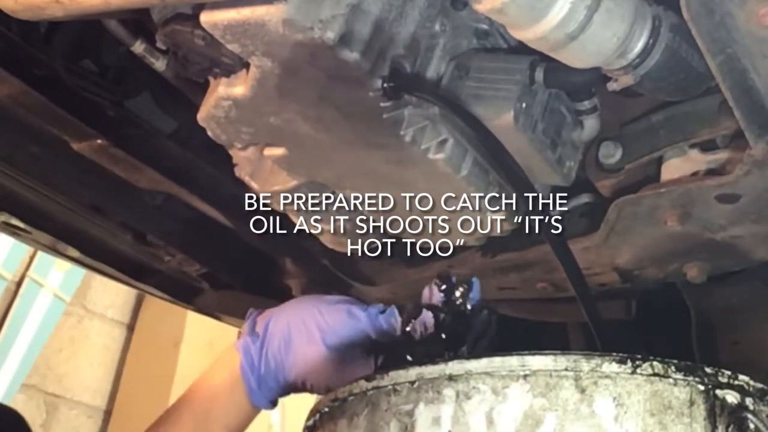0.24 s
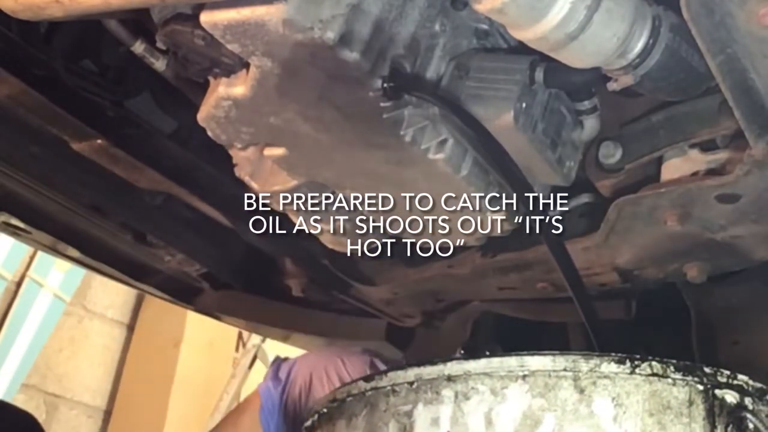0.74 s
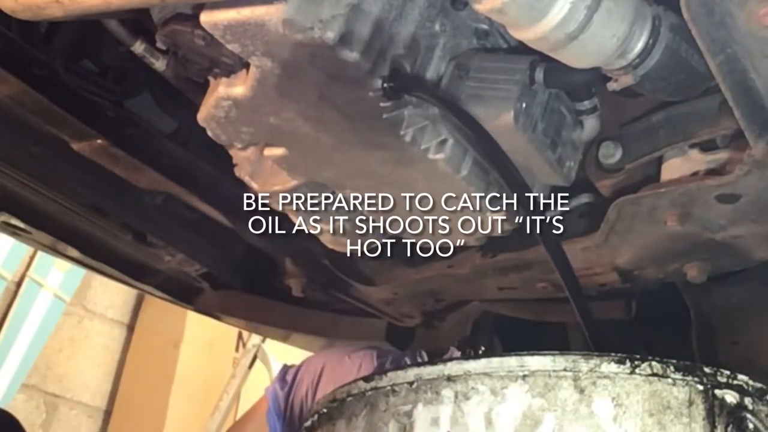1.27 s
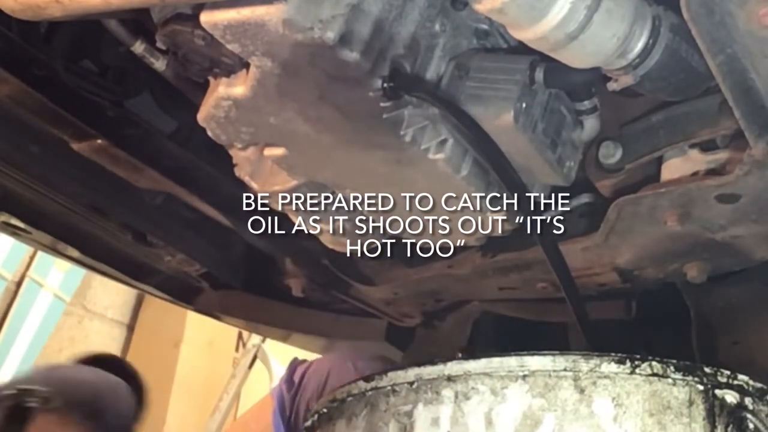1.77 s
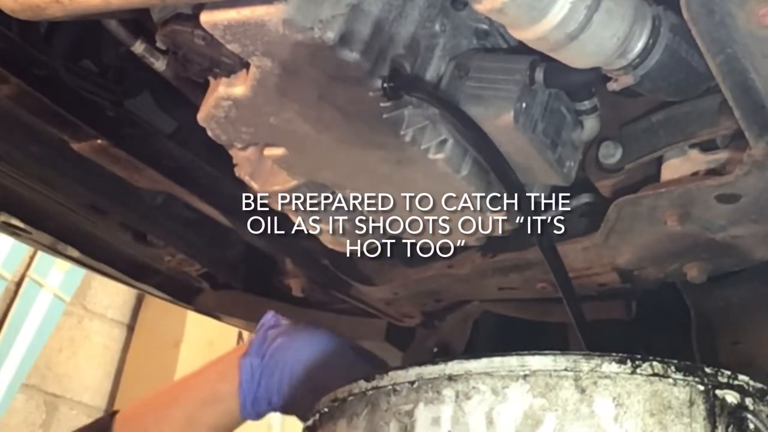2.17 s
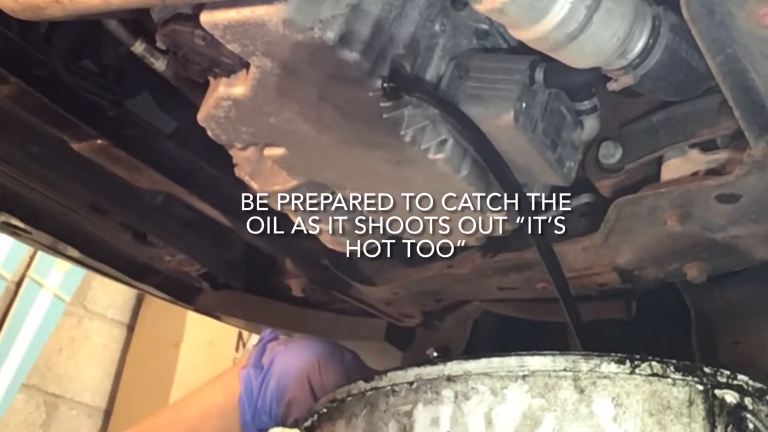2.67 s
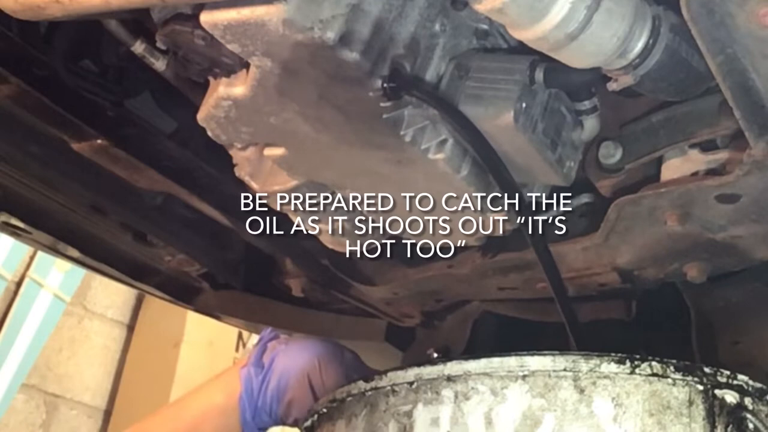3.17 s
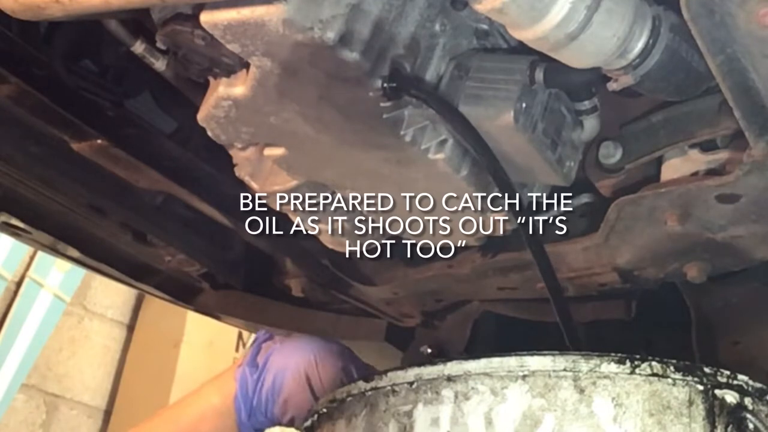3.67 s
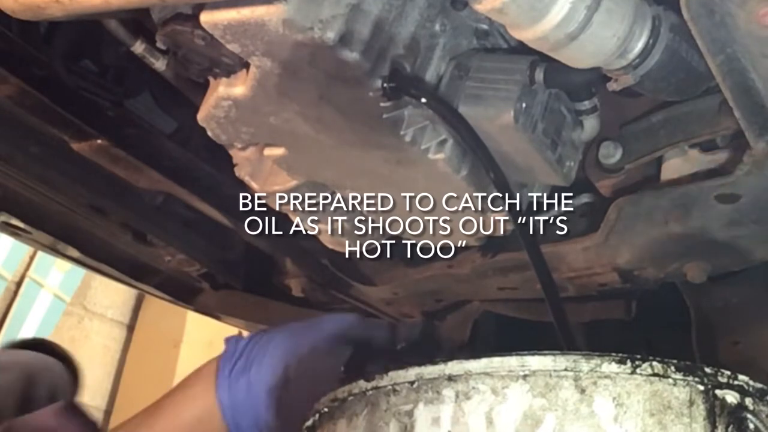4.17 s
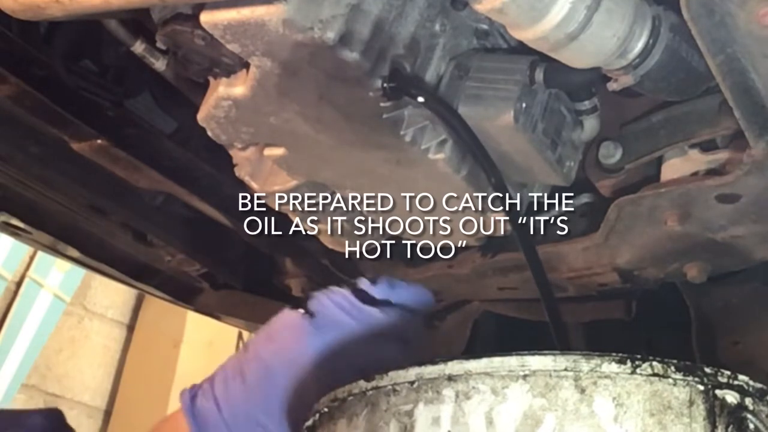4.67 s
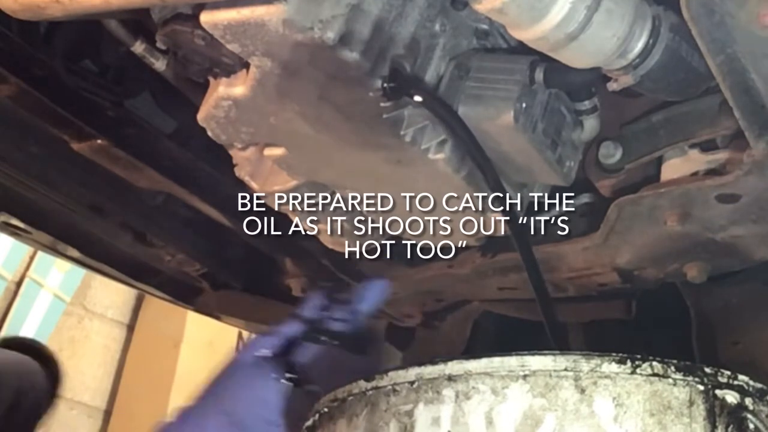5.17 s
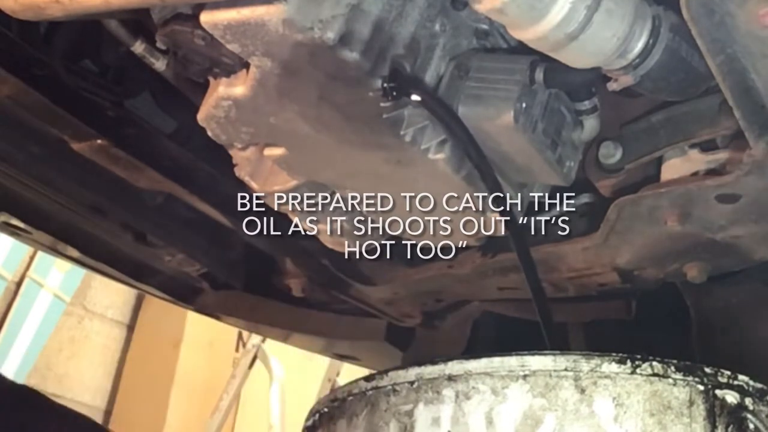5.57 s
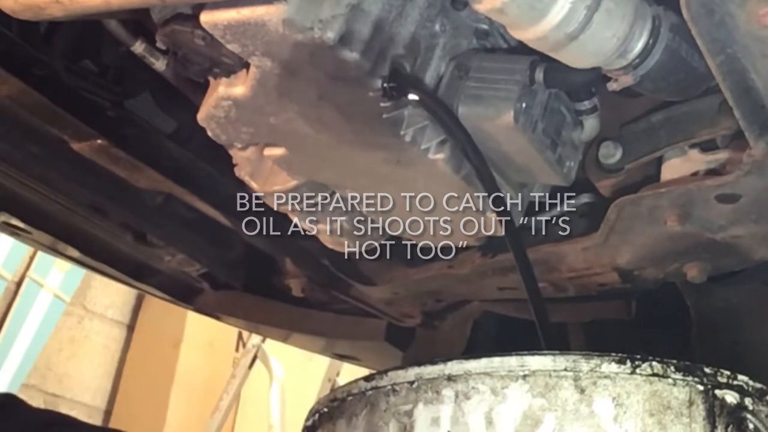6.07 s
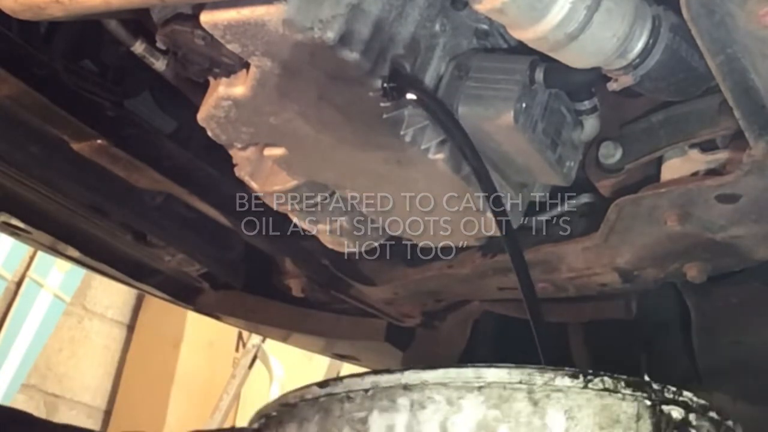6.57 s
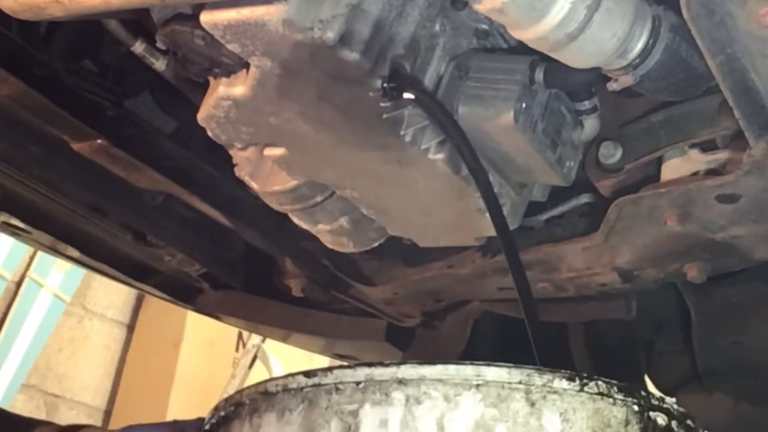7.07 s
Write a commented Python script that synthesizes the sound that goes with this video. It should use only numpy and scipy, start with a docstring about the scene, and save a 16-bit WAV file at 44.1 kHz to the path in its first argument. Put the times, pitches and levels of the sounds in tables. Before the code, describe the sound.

Heard close up under a car, over a low rumbling drone and faint hiss. From 0 to 0.4 seconds a glove rubs softly beneath a thin whining hiss, with small oil ticks and dull knocks at 0.2 and 0.65. Around 1.3 to 1.8 small bubbles glug and wet clicks gather. Bumps and rubs lead into a sudden gush just after 2: a bright spray spurt and a firm knock near 2.2, then crackling splashes and hollow low booms in the metal pan until about 4.2. A thump and brief splash come around 4.35. From 4.6 the flow thins to a quiet jet with separate sharp splats, and soft rubbing near 4.8 and 5.1. At 6.35 to 6.9 the pan is dragged in loud juddering, gritty scrapes with a strong knock at 6.5 and metallic ringing. Quiet returns, dips briefly near 7.15, then light clacks end it.

```python
"""Hot engine oil drains from a sump into a metal pan, heard close up under a car: bubble pings and clicks shaped
by a flow curve. It sprays past the loosened plug (bright hiss), falls in slaps that boom in the pan (swelling tones),
then settles to a quiet jet with single splats (crackle plus pings). A hand bumps (damped swings) and rubs (noise);
near the end the pan is dragged over the floor (stick-slip bursts through its resonances), then light clacks.
Behind: a thin early whine, low rumble with a drone, faint hiss (filtered noise)."""
import sys
import numpy as np
from scipy import signal
from scipy.fft import rfft, irfft
from scipy.io import wavfile
from scipy.ndimage import uniform_filter1d

SR = 44100
rng = np.random.default_rng(int(sys.argv[2]) if len(sys.argv) > 2 else 0)


def to_wav(sig):
    """Store sig (one row per channel, or 1-D mono) as 16-bit WAV at the path in sys.argv[1].

    Samples outside -1..1 are clipped; the rate is SR.
    """
    pcm = np.clip(np.atleast_2d(sig), -1, 1) * 32767
    pcm = np.round(pcm).astype(np.int16)
    wavfile.write(sys.argv[1], SR, pcm.T)  # frames by channels


N = 323694
T_S = np.arange(N) / SR

# Low rumble under the car: t/s, level/dB (before its flicker)
RUMBLE_LEVEL_DB = [(0, -61.5), (1.3, -64), (2.2, -57.5), (2.65, -67.5), (3.5, -66), (4.2, -62.5),
                   (5.4, -63), (5.65, -67), (7.34, -67.5)]
# Rumble spectrum: f/Hz, relative level/dB
RUMBLE_COLOUR_DB = [(30, -16), (50, -23), (75, -7.5), (112, 5), (150, -3), (220, -4.5), (330, -9),
                    (430, -9.5), (560, -13.5), (700, -31), (1500, -38), (3000, -40)]
# Low note of the space under the car: f/Hz, width/Hz, level/dB
DRONE_MODES = [(112, 15.5, 0)]
DRONE_DB = -71
# Faint hiss spectrum: f/Hz, relative density/dB
AIR_COLOUR_DB = [(500, 4.5), (1000, -0.5), (2200, -4), (4000, -9), (7000, -14), (9500, -8), (15500, -16)]
AIR_DB = -73.5

# Strength of the falling oil: t/s, level/dB (before surges)
FLOW_DB = [(0, -78), (.5, -93), (1.25, -78), (1.75, -79), (1.96, -78), (2.07, -60.5), (2.5, -62.5),
           (2.7, -65.5), (3.35, -63.5), (4.21, -64), (4.3, -72.5), (4.39, -60.5), (4.62, -68.5),
           (4.72, -72), (5.6, -73.5), (6.1, -79), (7.34, -77)]
# Splash spectrum: f/Hz, relative level/dB
SPLASH_COLOUR_DB = [(290, -38), (500, 13), (666, -7), (827, -4.5), (941, -11.5), (1100, -2), (1470, -11),
                    (2390, -7), (2890, -14.5), (3430, -2), (4000, -12), (4400, -2.5), (5200, -14),
                    (8240, -25), (15500, -42)]
# Fine spray spectrum: f/Hz, relative level/dB
SPRAY_COLOUR_DB = [(2000, -23), (4500, 5.5), (6500, 6.5), (9500, 2.5), (12000, -5.5), (15500, -5)]
SPRAY_DB, SPRAY_DB_PER_FLOW_DB = -70, 0.53  # at full flow, before surges; slope against flow
# Spurts of fine spray: start t/s, length/s, level/dB
SPURTS = [(1.62, 0.66, -67), (1.98, 0.13, -66), (2.212, 0.031, -51), (3.04, 0.05, -72), (3.29, 0.075, -66),
          (4.36, 0.086, -68), (7.18, 0.13, -76)]
SPURT_RISE_SHARE, SPURT_RELEASE_S = 0.092, 0.0067  # rise as share of length
# Clumps of oil landing: rate, decay of power, share of splash power
LANDINGS_PER_S, LANDING_DECAY_S, LANDING_SHARE = 170, 0.0054, 0.85
# Blobs of one size: rate, decay of power, share of that band's power
BLOBS_PER_S, BLOB_DECAY_S, BLOB_SHARE = 130, 0.0072, 0.77
# Air in the pan: f/Hz, width/Hz, level/dB
HOLLOW_MODES = [(408.5, 16.2, 11.5), (438, 20, 4.5), (1114, 72, -5.5), (1545, 57, -12), (2400, 110, -16),
                (4430, 76, -9)]
# Hum of the hollow, fading as the jet smooths out: t/s, level/dB
HUM_LEVEL_DB = [(1.2, -76), (2.2, -59), (3.5, -60), (4.1, -62.5), (4.9, -77)]
STEADY_SHARE = 0.17  # share of a note's flicker evened out

# Soft rubs of glove and sleeve: start t/s, length/s, level/dB (before flicker)
RUBS = [(0, 0.35, -70.5), (1.46, 0.17, -70.5), (1.69, 0.17, -67), (2.02, 0.089, -61.5), (2.12, 0.093, -55),
        (2.28, 0.32, -68.5), (4.74, 0.16, -65), (5.11, 0.35, -64.5), (7.19, 0.16, -71)]
# Rub spectrum: f/Hz, relative level/dB
RUB_COLOUR_DB = [(200, 7), (550, 6), (1300, 0), (2200, -4), (3500, -9), (7000, -9.5), (15000, -17.5)]
RUB_RISE_SHARE, RUB_RELEASE_S = 0.038, 0.033
# Thin early hiss with a faint whine: start t/s, length/s, level/dB
WHINE = [(0.0084, 0.41, -72.5)]
# Its bands: f/Hz, width/Hz, level/dB
WHINE_BANDS = [(3390, 120, 12), (4440, 920, 2)]
# Sharpest splats: t/s, level/dB, centre f/Hz
SPLATS = [(.152, -61, 3430), (0.193, -54.5, 2800), (0.403, -61, 3700), (.862, -61.5, 2290),
          (1.285, -61, 6340), (1.329, -60.5, 4420), (1.493, -60, 5130), (1.739, -66, 6360),
          (1.761, -53, 8350), (1.743, -59.5, 1770), (1.826, -48.5, 4930), (1.884, -56.5, 6150),
          (2.048, -58, 7600), (2.277, -58, 2990), (2.595, -53.5, 4030), (3.002, -57, 5000),
          (3.196, -56, 3580), (3.218, -67, 7080), (3.302, -52.5, 4300), (3.328, -53, 6860),
          (3.507, -61, 7300), (3.562, -54, 4360), (3.752, -53, 4300), (3.852, -50, 3040),
          (3.936, -53.5, 4630), (3.976, -54, 4430), (4.109, -57.5, 3200), (4.154, -50, 3640),
          (4.456, -60, 2840), (4.61, -53.5, 4440), (4.687, -53, 3490), (4.797, -56, 2620),
          (4.94, -53, 3730), (4.982, -56.5, 3520), (5.467, -57.5, 3460), (5.727, -57, 3180),
          (5.819, -58, 3630), (5.903, -59, 4600), (6.169, -57.5, 3460), (6.273, -54, 4180)]

# Dull knocks: t/s, level/dB, swing f/Hz
KNOCKS = [(0.21, -50.5, 566), (.217, -49, 200), (0.647, -41, 354), (.682, -47, 191), (1.86, -44, 370),
          (2, -39.5, 228), (2.066, -44, 228), (2.203, -35.5, 397), (2.214, -41.5, 211), (4.076, -47, 204),
          (4.112, -50, 206), (4.256, -47.5, 520), (4.337, -37.5, 260), (4.356, -45.5, 460),
          (4.555, -46, 218), (5.033, -50, 534), (5.434, -51, 192), (6.309, -48, 207), (6.427, -29, 437),
          (6.472, -31.5, 426), (6.4905, -18.5, 433), (6.692, -43.5, 475), (6.796, -32.5, 417),
          (6.831, -28.5, 348)]
# Low body set swinging by knocks; level against the blow for slow blows
THUD_HZ, THUD_DB, THUD_DECAY_S = 114.7, -3.5, 0.018
# Pan wall: f/Hz, width/Hz, level/dB
WALL_MODES = [(161, 48, -5.5), (259, 35, -1.5), (320, 15, 2.5), (417, 17, 10), (487, 24, 8.5),
              (544, 11, 8.5), (770, 80, -8.5), (1030, 54, -8), (1125, 37, 2)]

# Air bubbles as the plug comes free: mean time and spread, median level
GLUG_S, GLUG_SPREAD_S, GLUG_DB = 1.56, 0.17, -69.5
GLUG_HZ, GLUG_SPREAD_OCTAVES, GLUG_DECAY_S = 1450, 0.37, 0.003
# Heavy slugs of oil landing in the pan: t/s, boom level/dB
SLUGS = [(1.306, -55), (1.524, -54.5), (2.225, -42), (2.328, -48.5), (2.403, -45.5), (2.499, -64),
         (2.581, -54), (2.77, -55.5), (2.866, -54), (3.079, -50.5), (3.138, -46.5), (3.214, -54),
         (3.311, -50), (3.357, -46.5), (3.432, -51), (3.571, -52), (3.624, -53.5), (3.696, -54),
         (3.775, -52.5), (3.852, -55), (3.997, -68), (4.15, -53), (4.389, -53.5)]
SLUG_HZ, SLUG_RISE_S, SLUG_DECAY_S = 409, 0.011, 0.018
SURGE_DB, SURGE_WIDTH_S, SURGE_LEAD_S = 4.5, 0.013, 0.0047  # splash swell per slug, ahead of its boom

# Shoves that drag the pan: start t/s, length/s, shudder level/dB, grit level/dB
SHOVES = [(6.357, 0.089, -36.5, -50.5), (6.442, 0.085, -38.5, -50.5), (6.529, 0.082, -51, -51.5),
          (6.584, 0.11, -43.5, -58), (6.707, 0.029, -52.5, -83), (6.776, 0.025, -37, -62.5),
          (6.815, 0.045, -40, -63.5)]
SHOVE_RISE_SHARE, SHOVE_RELEASE_S = 0.55, 0.021
# Stick-slip: rate, decay of power, slips' share of power
SLIPS_PER_S, SLIP_DECAY_S, SLIP_SHARE = 320, 0.0038, 0.99
# Grit spectrum: f/Hz, relative level/dB
GRIT_COLOUR_DB = [(400, -21), (900, 9), (1500, 2), (2300, -7), (4400, -3), (6000, -11.5), (8500, -10.5),
                  (15500, -23)]
# Thin metallic ring of the rim: f/Hz, width/Hz, level/dB
RIM_MODES = [(1850, 170, 6), (2335, 40, 13), (2490, 24, 0), (3090, 76, 2)]
# Grit cracking under the pan: t/s, level/dB, centre f/Hz, decay/s
CRACKS = [(6.419, -50, 2770, .008), (6.434, -40.5, 2200, 0.008), (6.531, -46, 2180, .004),
          (6.609, -47.5, 4300, 0.022), (6.868, -58, 5660, 0.0042)]
# Something hard being handled: t/s, level/dB
CLACKS = [(7.205, -60.5), (7.251, -61.5), (7.301, -51)]
# Its resonances: f/Hz, width/Hz, level/dB
CLACK_MODES = [(630, 110, 1.5), (1500, 70, -6), (2460, 180, -14)]

# Bands cancelled by the echo off the pan's side: f/Hz, width/Hz
NULLS = [(665, 152), (1470, 106)]
ECHO_T60_S = 0.065
DIP_S, DIP_DECAY_S, DIP_DB = 7.159, 0.012, -24  # brief level dip, depth at its centre
EDGE_HZ = 15750


def gain_of(db):
    """Decibels to amplitude."""
    return 10 ** (np.asarray(db) / 20)


def evened(x):
    """Scales to rms 1."""
    return x / np.sqrt(np.mean(x ** 2) + 1e-20)


def loudest(x, size):
    """Scales so that the loudest stretch of size samples has rms 1."""
    return x / np.sqrt(uniform_filter1d(x ** 2, size, mode="constant").max() + 1e-20)


def level(rows):
    """Amplitude over time from a curve of (t/s, level/dB)."""
    return gain_of(np.interp(T_S, *np.transpose(rows)))


def add(mix, start_s, sound):
    """Mixes a sound in, in place."""
    part = mix[max(round(start_s * SR), 0):][:len(sound)]
    part += sound[:len(part)]


def colour(x, points):
    """Filters by a spectrum of (f/Hz, level/dB), log-frequency interpolation; rms 1."""
    hz, db = np.transpose(points)
    f_hz = np.fft.rfftfreq(len(x), 1 / SR)
    gain = gain_of(np.interp(np.log(f_hz + 1), np.log(hz), db))
    return evened(irfft(rfft(x) * gain, len(x)))


def wander(hz):
    """Random drift of rms 1, up to about hz."""
    f_hz = np.fft.rfftfreq(N, 1 / SR)
    return evened(irfft(rfft(rng.standard_normal(N)) / (1 + (f_hz / hz) ** 4), N))


def resonate(x, hz, width_hz):
    """One resonance, unit gain at its peak."""
    return signal.lfilter(*signal.iirpeak(min(hz, SR / 2 - 1), hz / width_hz, SR), x)


def ring(x, modes):
    """A body's resonances in parallel, all driven by x."""
    return sum(gain_of(db) * resonate(x, hz, width_hz) for hz, width_hz, db in modes)


def steadied(x):
    """Evens out part of a note's flicker; rms 1."""
    power = abs(uniform_filter1d(x ** 2, size=1000)) + 1e-20
    return evened(x / power ** (STEADY_SHARE / 2))


def gestures(rows, rise_share, release_s, curve=0.98):
    """Amplitude of (start/s, length/s, level/dB) moves: swell, hold, die away; powers add."""
    power = np.zeros(N)
    for start_s, length_s, db in rows:
        t = np.arange(0, length_s + 10 * release_s, 1 / SR)
        swell = np.minimum(t / (rise_share * length_s), 1) ** curve
        release = np.exp(-np.maximum(t - length_s, 0) / release_s)
        add(power, start_s, (gain_of(db) * swell * release) ** 2)
    return np.sqrt(power)


def clicks(per_s, mean_db):
    """Random impacts, mostly small, a few large; exponential spread in dB, rms 1."""
    size = gain_of(mean_db * np.minimum(rng.exponential(1, N), 4))
    sign = rng.choice([-1, 1], N)
    return evened(size * sign * (rng.random(N) < per_s / SR))


def bursts(per_s, decay_s, share):
    """Amplitude of random contacts over a steady floor: instant start, exponential decay of power."""
    t = np.arange(SR // 20) / SR
    hits = rng.exponential(1, N) * (rng.random(N) < per_s / SR)
    power = abs(signal.oaconvolve(hits, np.exp(-t / decay_s))[:N])
    return np.sqrt(1 - share + share * power / power.mean())


def bubbles(count=800, spread_db=4.0, cycles=6.2):
    """Bubbles of many sizes pop; thick oil damps each within a few cycles."""
    t, out = np.arange(SR // 25) / SR, np.zeros(N)
    for hz in np.geomspace(900, 13000, 36):
        age = hz * t / cycles
        swing = np.sin(2 * np.pi * hz * t) * np.exp(-age) * (1 - np.exp(-3 * age))
        ping = np.sqrt(hz) * evened(swing)
        for when, size, sign in rng.random((count, 3)):
            gain = gain_of(-spread_db * np.log(size + 0.066))
            add(out, when * N / SR, np.sign(sign - .5) * gain * ping)
    return evened(out)


def blobs(x, count=10):
    """Lumps of each size come at their own moments, so the colour keeps shifting; rms 1."""
    octave = np.log2(np.fft.rfftfreq(N, 1 / SR) + 1)
    centres = np.log2(np.geomspace(900, 13000, count))
    spectrum, out = rfft(x), np.zeros(N)
    for band in np.eye(count):
        part = irfft(spectrum * np.interp(octave, centres, band), N)
        out += part * bursts(BLOBS_PER_S, BLOB_DECAY_S, BLOB_SHARE)
    return evened(out)


def garage():
    """Lumpy low rumble, one steady droning note and thin hiss, all filtered noise."""
    low, air, note = rng.standard_normal((3, N))
    boom = colour(low, RUMBLE_COLOUR_DB) * gain_of(1.2 + 2.0 * wander(14)) * level(RUMBLE_LEVEL_DB)
    drone = gain_of(DRONE_DB) * steadied(ring(note, DRONE_MODES))
    return boom + drone + gain_of(AIR_DB) * colour(air, AIR_COLOUR_DB)


def stream(spray_flicker_db=3.7):
    """Landing clumps crackle with small bubbles, throw fine spray and keep the pan's air humming."""
    flow = level(FLOW_DB)
    landings = bursts(LANDINGS_PER_S, LANDING_DECAY_S, LANDING_SHARE)
    t = T_S[::20]
    swell = sum(np.exp(-.5 * ((t - s + SURGE_LEAD_S) / SURGE_WIDTH_S) ** 2) for s, _ in SLUGS)
    surge = gain_of(SURGE_DB * np.interp(T_S, t, swell) + 0.91 * wander(24))

    drops = blobs(bubbles() + .45 * clicks(5000, 0.84))
    splash = colour(drops, SPLASH_COLOUR_DB) * flow * landings * surge

    thrown = gain_of(SPRAY_DB) * (flow / flow.max()) ** SPRAY_DB_PER_FLOW_DB * surge
    spurts = gestures(SPURTS, SPURT_RISE_SHARE, SPURT_RELEASE_S)
    droplets = blobs(bubbles() + 0.62 * rng.standard_normal(N))
    mist = colour(droplets, SPRAY_COLOUR_DB) * landings * gain_of(spray_flicker_db * wander(110))

    hum = steadied(ring(rng.standard_normal(N) * landings, HOLLOW_MODES)) * level(HUM_LEVEL_DB)
    return splash + mist * np.hypot(thrown, spurts) + hum


def glove():
    """Rubber and cloth slide and catch: an uneven, grainy rustle."""
    grain = colour(rng.standard_normal(N) + 1.2 * clicks(900, 1.1), RUB_COLOUR_DB)
    return grain * gestures(RUBS, RUB_RISE_SHARE, RUB_RELEASE_S) * gain_of(3.5 * wander(29))


def whine(rise_share=0.32, release_s=0.0094):
    """Thin, steady hiss with one narrow band, stopping short."""
    hiss = evened(ring(rng.standard_normal(N), WHINE_BANDS))
    return hiss * gestures(WHINE, rise_share, release_s)


def splat(hz, scatter_s=0.0094, cycles=13, bubble_db=1, count=5, crackle_s=0.0052):
    """A slap of oil: short crackle, and a few bubbles near one pitch popping in turn."""
    t = np.arange(SR // 16) / SR
    points = [(hz / 8, -22), (hz * .5, -11), (hz, 0), (hz * 1.53, -7), (hz * 3, -26)]
    crackle = colour(rng.standard_normal(len(t)), points)
    crackle *= np.exp(-t / crackle_s) * (1 - np.exp(-t / .0007))
    pings = np.zeros(len(t))
    for k, (wait, detune) in enumerate(rng.random((count, 2))):
        ratio = 2 ** (0.794 * (detune - .5)) if k else 1  # first bubble on pitch
        turns = hz * ratio * t
        ping = np.sin(2 * np.pi * turns) * np.exp(-turns / cycles) * (1 - np.exp(-turns / 2))
        add(pings, scatter_s * wait * k / count, ping / np.sqrt(1 + k))
    return loudest(evened(crackle) + gain_of(bubble_db) * evened(pings), size=100)


def splats():
    """Sharp slaps of oil that stand out of the stream."""
    out = np.zeros(N)
    for s, db, hz in SPLATS:
        add(out, s, gain_of(db) * splat(hz))
    return out


def knocks(overtone=0.28, wall_db=-13, slow_hz=250):
    """Heavily damped swings with a brief overtone; wall and low thud ring most after slow blows."""
    t, out = np.arange(SR // 4) / SR, np.zeros(N)
    thud = np.sin(2 * np.pi * THUD_HZ * t) * np.exp(-t / THUD_DECAY_S) * (1 - np.exp(-THUD_HZ * t * 2))
    thud *= gain_of(THUD_DB)
    for s, db, hz in KNOCKS:
        cycles, slow = hz * t, min(slow_hz / hz, 1)
        swing = np.sin(2 * np.pi * cycles) * cycles ** 2.36 * np.exp(-cycles / 0.29)
        upper = np.sin(2 * np.pi * 2.2 * cycles) * np.exp(-cycles / 0.97) * (1 - np.exp(-10 * cycles))
        blow = swing / abs(swing).max() + overtone * upper
        add(out, s, gain_of(db) * (loudest(blow, size=170) + slow ** 2 * thud))
        wall = loudest(ring(blow, WALL_MODES), size=170)
        add(out, s + 2 / hz, gain_of(db + wall_db) * slow * wall)  # two cycles late
    return out


def glugs(count=34, glide_per_s=6):
    """Larger bubbles, each a soft damped blip rising a little in pitch."""
    t, out = np.arange(SR // 25) / SR, np.zeros(N)
    for when, pitch, size in rng.standard_normal((count, 3)):
        hz = GLUG_HZ * 2 ** (GLUG_SPREAD_OCTAVES * pitch)
        turns = hz * t * (1 + glide_per_s * t / 2)
        blip = np.sin(2 * np.pi * turns) * np.exp(-t / GLUG_DECAY_S) * (1 - np.exp(-turns / 2))
        gain = gain_of(GLUG_DB + 1.3 * size)
        add(out, GLUG_S + GLUG_SPREAD_S * when, gain * loudest(blip, size=100))
    return out


def slugs():
    """Each slug swings the air in the pan: a short boom that swells and dies away."""
    t, out = np.arange(-SR // 20, SR // 10) / SR, np.zeros(N)
    rise, fall = np.exp(-.5 * (t / SLUG_RISE_S) ** 2), np.exp(-abs(t) / SLUG_DECAY_S)
    shape = np.where(t < 0, rise, fall)
    for (s, db), phase in zip(SLUGS, rng.random(len(SLUGS))):
        tone = evened(np.sin(2 * np.pi * (SLUG_HZ * t + phase)))
        add(out, s + t[0], gain_of(db) * shape * tone)
    return out


def drag(curve=1.02):
    """The pan's base sticks and slips over grit; slips shake its wall, crunch and ring its rim."""
    shudders = [(s, length_s, db) for s, length_s, db, _ in SHOVES]
    crunches = [(s, length_s, db) for s, length_s, _, db in SHOVES]
    push = gestures(shudders, SHOVE_RISE_SHARE, SHOVE_RELEASE_S, curve)
    bite = gestures(crunches, SHOVE_RISE_SHARE, SHOVE_RELEASE_S, curve)
    slips = bursts(SLIPS_PER_S, SLIP_DECAY_S, SLIP_SHARE)
    jolts = colour(rng.standard_normal(N) * slips, [(60, -34), (170, 2), (1250, -8), (1700, -13)])
    slosh = bubbles(count=450, spread_db=3.5, cycles=15)  # oil among the grit
    grains = evened(clicks(2500, 3.3) * slips + slosh)
    scrape = colour(grains, GRIT_COLOUR_DB) + gain_of(-4) * evened(ring(grains, RIM_MODES))
    return steadied(ring(jolts, WALL_MODES)) * push + scrape * bite


def cracks():
    """Each catch of grit is a rough, bright, decaying noise burst with a sharp start."""
    t, out = np.arange(SR // 10) / SR, np.zeros(N)
    noises = rng.standard_normal((len(CRACKS), len(t)))
    for (s, db, hz, decay_s), noise in zip(CRACKS, noises):
        burst = resonate(noise * abs(noise) * np.exp(-t / decay_s), hz, .5 * hz)
        add(out, s, gain_of(db) * loudest(burst, size=170))
    return out


def clacks(contact_s=0.0072):
    """Brief noisy contacts ring a small hard body."""
    t, out = np.arange(SR // 20) / SR, np.zeros(N)
    noises = rng.standard_normal((len(CLACKS), len(t)))
    for (s, db), noise in zip(CLACKS, noises):
        body = ring(noise * np.exp(-t / contact_s), CLACK_MODES)
        add(out, s, gain_of(db) * loudest(body, size=170))
    return out


def underbody(x, wet_db=-7):
    """Dense short echoes between floor and car: random decaying taps."""
    t = np.arange(SR // 3) / SR
    taps = rng.choice([-1, 1], len(t)) * (rng.random(len(t)) < 2000 / SR)
    taps = taps * (t > .002) * gain_of(-60 * t / ECHO_T60_S)
    return x + gain_of(wet_db) * signal.fftconvolve(x, taps / np.linalg.norm(taps))[:N]


def beside_pan(x):
    """Hollows out narrow bands of sounds made right beside the pan."""
    for hz, width_hz in NULLS:
        x = x - resonate(x, hz, width_hz)
    return x


def scene():
    """Oil under the car, with knocks, dragged pan, glove and garage around it."""
    oil = underbody(stream() + splats() + glugs())
    pan = beside_pan(drag() + cracks() + slugs() + knocks())
    return (oil + pan + clacks() + glove() + whine() + garage())[None]


def record(dry):
    """The microphone sheds deep bass, the level dips briefly near the end, then the band limit."""
    highpass = signal.butter(4, 68, "highpass", fs=SR, output="sos")
    thin = signal.sosfilt(highpass, dry)
    dip = gain_of(DIP_DB * np.exp(-abs(T_S - DIP_S) / DIP_DECAY_S))
    lowpass = signal.firwin(511, EDGE_HZ, window=("kaiser", 9), fs=SR)
    return signal.oaconvolve(thin * dip, lowpass[None], "same")


dry = scene()
out = record(dry)
to_wav(out)
```